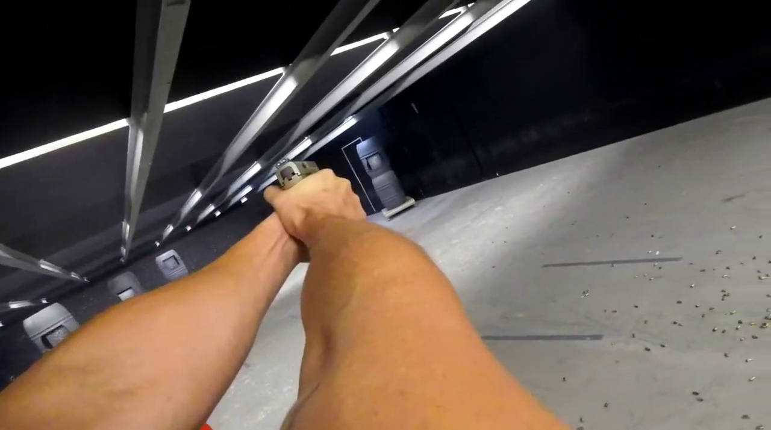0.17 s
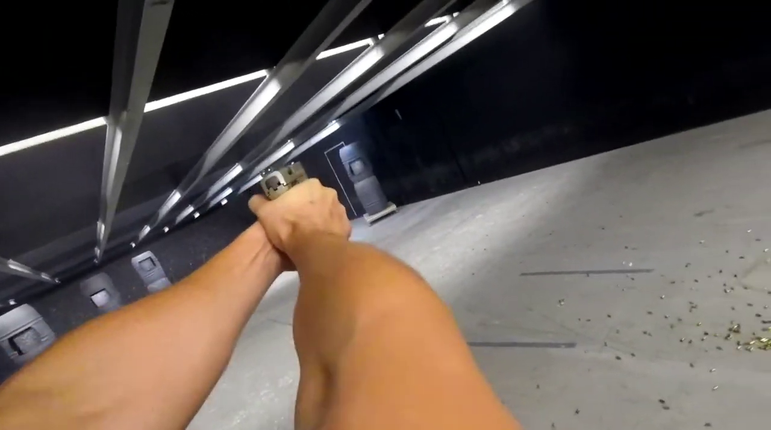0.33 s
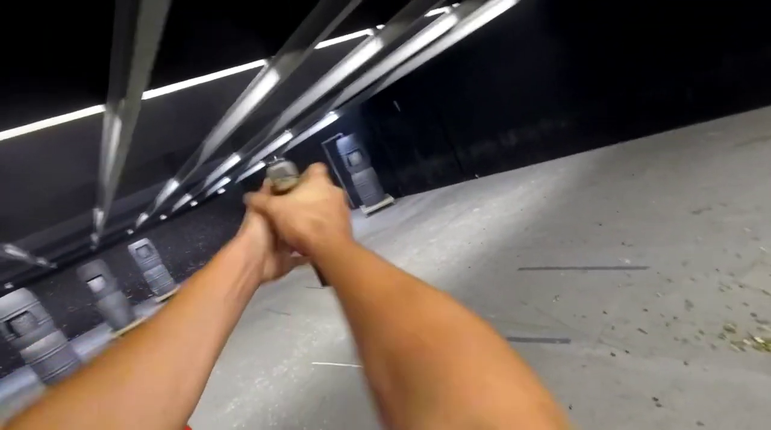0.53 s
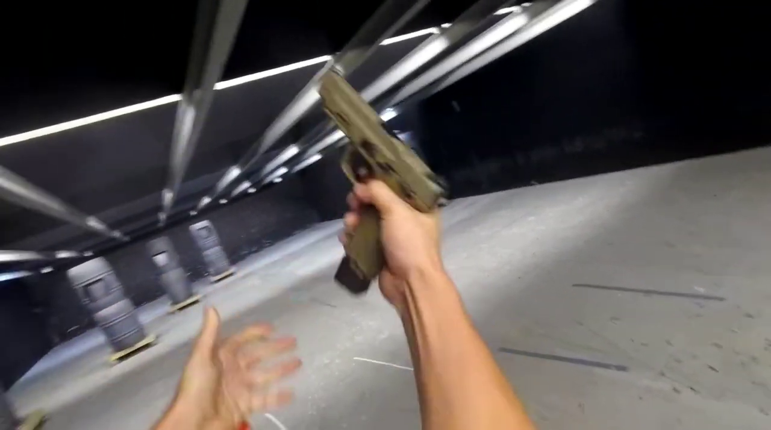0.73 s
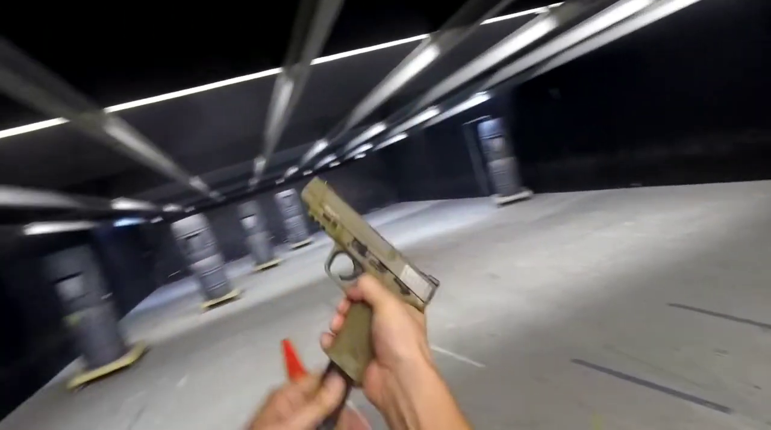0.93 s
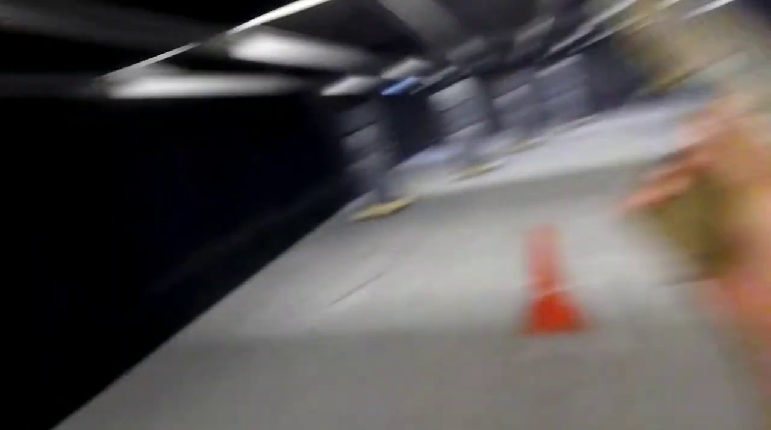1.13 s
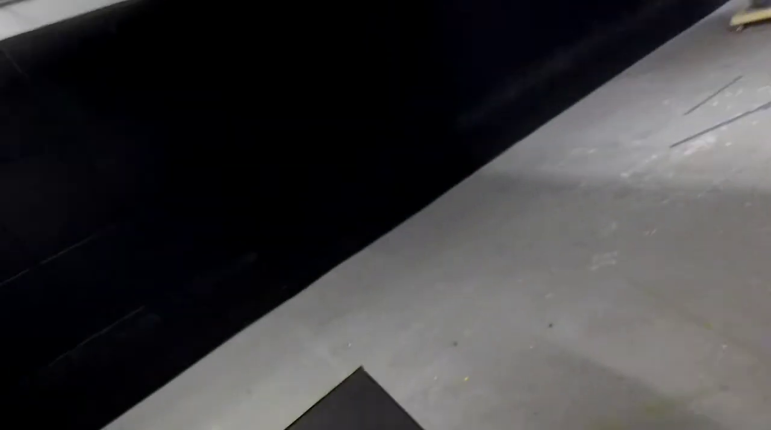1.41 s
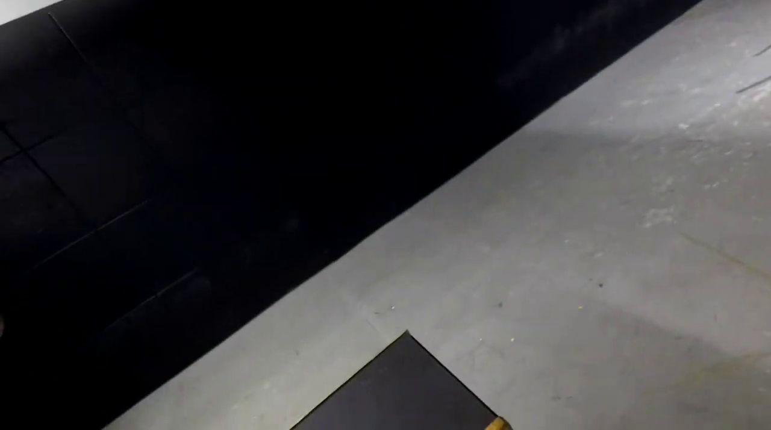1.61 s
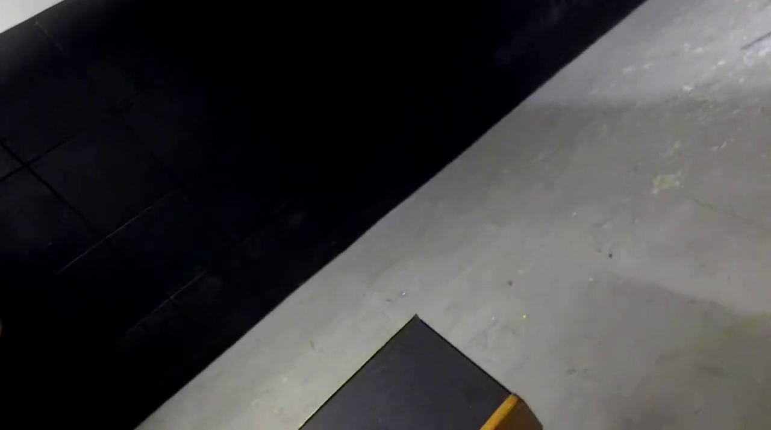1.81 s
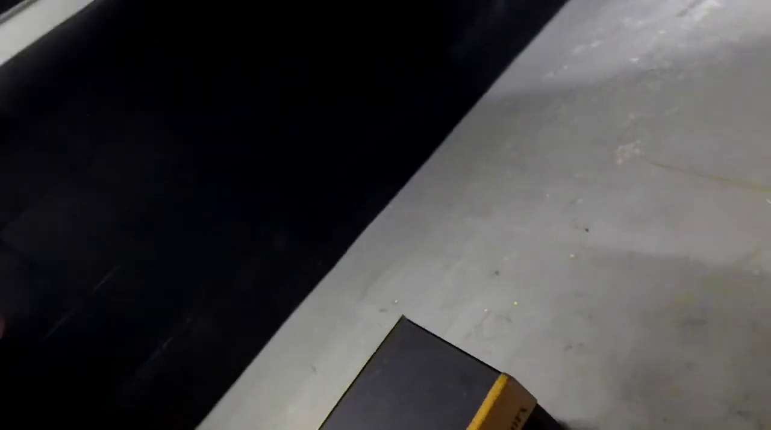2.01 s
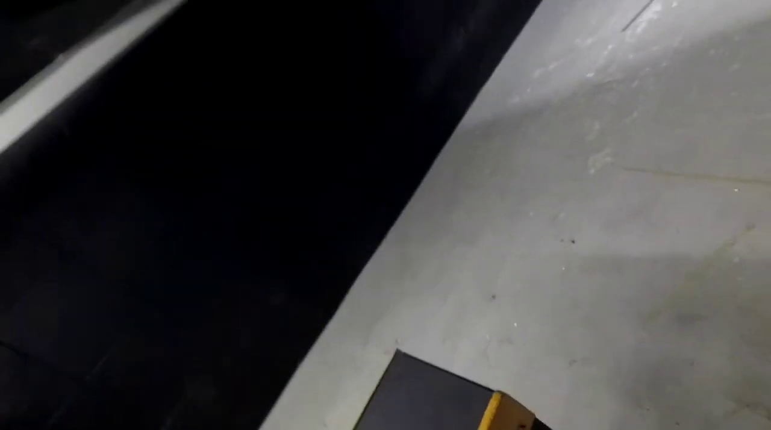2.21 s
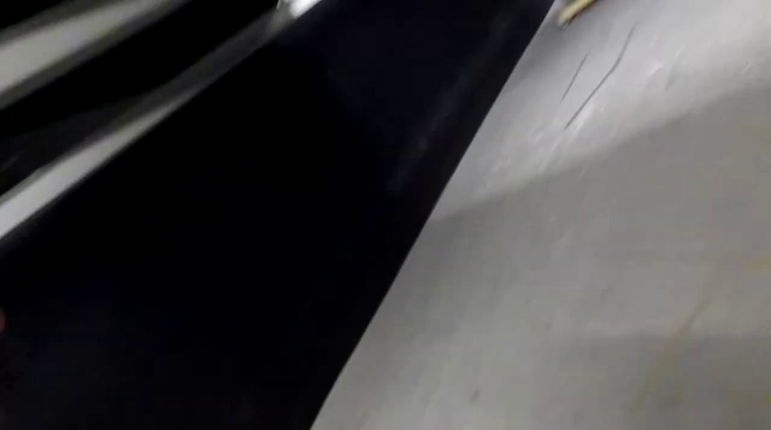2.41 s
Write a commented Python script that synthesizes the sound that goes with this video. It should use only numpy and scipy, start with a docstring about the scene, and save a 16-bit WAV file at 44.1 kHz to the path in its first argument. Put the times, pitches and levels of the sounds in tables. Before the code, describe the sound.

Heard from the shooter's head, a sharp gunshot bursts and echoes in a large indoor hall, steel pings downrange, magazine clicks and dull knocks follow, the slide snaps shut, and air rushes as the shooter moves.

```python
"""One pistol shot in an indoor range, heard at the shooter's head: a brief swell leads into the report, then
sharp cracks, pressure pulses and a gas burst overload the microphone, and filtered noise rolls through the
hall. Struck steel plates ring on as wavering partials. The reload is short noise bursts: small clicks, dull
knocks and a hard clack. Ventilation is steady noise; rumble and rush follow the motion."""
import sys
import numpy as np
from scipy import signal
from scipy.fft import rfft, irfft
from scipy.io import wavfile

SR = 44100
rng = np.random.default_rng(int(sys.argv[2]) if len(sys.argv) > 2 else 0)


def digitize_waveform(pressure):
    """Quantize a signal to 16-bit integers and store it at the path in sys.argv[1].

    Rows of a 2-D input are taken as channels; values are limited to [-1, 1].
    """
    field = np.atleast_2d(pressure).T
    bounded = np.clip(field, -1, 1)
    quanta = np.round(bounded * 32767).astype(np.int16)
    wavfile.write(sys.argv[1], SR, quanta)


N = 112454
T = np.arange(N) / SR
HZ = np.fft.rfftfreq(N, 1 / SR)

# All spectra below are relative; the noise made from them is scaled to rms 1.
# Ventilation spectrum. Each row: frequency in Hz, density in dB per Hz.
VENT_SPECTRUM = [(15, -26.5), (25, 3.5), (82, 0.5), (293, -13.5), (595, -3), (1450, -31), (1600, -5.5),
                 (1770, -27.5), (4890, -51), (5270, -33.5), (10700, -51.5), (13900, -83.5), (22000, -120)]
VENT_DB = -62
# Moving air spectrum. Each row: frequency in Hz, density in dB per Hz.
AIR_SPECTRUM = [(12, -28), (20, 1.5), (59, 2), (136, -10.5), (231, -10.5), (325, -19), (380, -16),
                (644, -28), (715, -23), (1660, -39.5), (1890, -37.5), (4630, -55), (7430, -50),
                (10700, -52), (13900, -86), (22000, -120)]
# Air levels as the shooter moves. Each row: time in seconds, rumble level in dB, rush level in dB.
MOTION_LEVELS = [(0, -57, -59.5), (.8, -67.5, -78), (1.1, -52, -70.5), (1.4, -49, -62), (1.6, -46, -56),
                 (1.9, -42, -50.5), (2.0, -43.5, -52), (2.069, -40.5, -48), (2.301, -39.5, -47.5),
                 (2.451, -38, -41.5), (2.55, -37, -42.5)]
RUMBLE_EDGE_HZ = 200

# Light metal clicks of pistol and magazine.
# Each row: start in seconds, level in dB, centre frequency in Hz, decay constant in seconds.
METAL_CLICKS = [(.126, -61.5, 4300, 0.004), (1.070, -57.5, 4600, .012), (1.180, -69.5, 4650, 0.019),
                (1.515, -63, 6000, .008)]
CLICK_WIDTH_OCTAVES = 0.33
# Magazine catch spectrum. Each row: frequency in Hz, density in dB per Hz.
CATCH_SPECTRUM = [(400, -25), (1500, -6), (2400, -11.5), (4500, -16.5), (5600, -3), (6500, -15),
                  (7600, 2.5), (8800, -21), (12000, -21)]
CATCH_S, CATCH_DB, CATCH_DECAY_S = .8235, -47.5, 0.0046
# Duller knocks of gear and feet. Each row: start in seconds, level in dB, decay constant in seconds.
GEAR_KNOCKS = [(.924, -57.5, .008), (.9925, -43, 0.0032), (1.0352, -39, 0.0025), (1.039, -43, .006),
               (2.113, -48.5, 0.02), (2.476, -46.5, 0.011)]
# Knock spectrum. Each row: frequency in Hz, density in dB per Hz.
KNOCK_SPECTRUM = [(200, -18), (480, -15), (800, 4), (1300, -1), (2200, -5.5), (2900, -20), (4500, -24),
                  (7000, -47), (11000, -48)]
# Slide release spectrum. Each row: frequency in Hz, density in dB per Hz.
SNICK_SPECTRUM = [(120, -25), (200, -8.5), (396, 9), (838, -22), (1170, 6.5), (1580, -3), (2390, -5.5),
                  (3570, -4), (4010, -20.5), (6400, 0.5), (10700, -30), (13900, -59), (22000, -120)]
SNICK_S, SNICK_DB, SNICK_DECAY_S = 1.7092, -23, .0045
# Slide closing spectrum. Each row: frequency in Hz, density in dB per Hz.
CLACK_SPECTRUM = [(60, -28), (150, -5.5), (300, -15), (600, 1), (1000, -4.5), (1500, 3), (2100, -17),
                  (3000, -12.5), (4800, -30), (6000, -20), (8000, -39), (10700, -36), (13000, -60)]
CLACK_S, CLACK_DB, CLACK_DECAY_S = 1.7335, -20, 0.0075
# The hall's answer to the clack. Each row: frequency in Hz, density in dB per Hz.
CLACK_TAIL_SPECTRUM = [(100, -16), (270, 7.5), (420, -7), (600, 2.5), (800, 3.5), (1100, -8), (1500, -5),
                       (2500, -14), (4600, -28.5), (6500, -33), (8500, -33.5), (10500, -53), (13000, -65)]
CLACK_TAIL_DB, CLACK_TAIL_RISE_S = -29, 0.0049
SMALL_ROOM_DB, HANDLING_T60_SHARE = -12, .6

# Modes of the plate struck by this shot.
# Each row: frequency in Hz, peak level in dB, time of the peak in seconds, t60 in seconds.
PLATE_MODES = [(3009, -45, .40, 0.53), (3338, -51, .47, 0.86), (4260, -54, .38, 0.33),
               (5200, -56.5, .42, 0.42), (5320, -66, .62, 1.55), (7240, -60, .42, 1.26),
               (7310, -50, .42, 0.89), (8720, -86.5, 1, 3.3), (9800, -69.5, 0.32, 0.84),
               (10780, -63.5, .36, 0.48)]
PLATE_S, LONG_RING_RISE_S = 0.22, 0.073
# Plate still ringing from the hit before.
# Each row: frequency in Hz, level at time zero in dB, t60 in seconds.
OLD_PLATE_MODES = [(1577, -56, 1.8), (1642, -57, 1.8), (5179, -78, 1.2), (7138, -82, 1.3)]
OLD_PLATE_END_S, OLD_PLATE_FADE_S = .3, .1
# Longest ring, swelling and fading. Each row: time in seconds, level in dB.
LOW_RING_LEVELS = [(.25, -48), (.6, -61.5), (.68, -71), (.75, -62), (.88, -60), (1.0, -61.5), (1.07, -68),
                   (1.15, -65), (1.26, -57.5), (1.34, -62), (1.43, -73), (1.52, -65), (1.7, -78.5),
                   (2.5, -87)]
LOW_RING_HZ, HIGH_RING_HZ, HIGH_RING_DB = 1618.6, 7195, -83

SHOT_S, CRACK_S = .2152, .2164
# Swell just before the report's peak. Each row: frequency in Hz, density in dB per Hz.
SWELL_SPECTRUM = [(60, -22.5), (150, -8), (300, -1), (600, -12), (1000, -22.5), (1900, -8.5), (2500, -14),
                  (2800, -27), (3400, -15.5), (4200, -23.5), (4800, -36), (7200, -34.5), (8400, -26.5),
                  (10000, -38.5), (11000, -51.5)]
# Resonances in the swell. Each row: frequency in Hz, level in dB.
SWELL_RESONANCES = [(334, -12), (1170, -25.5), (1355, -20.5), (1820, -13), (1915, -22), (2300, -22.5),
                    (2400, -23), (3240, -27.5), (3800, -31.5)]
SWELL_S, SWELL_DB, SWELL_POWER = 0.044, -13, 2.5
# Muzzle blast and its slap off floor, walls and ceiling.
# Each row: start in seconds, level in dB (near the peak), pulse length in seconds.
BLAST_PULSES = [(.2155, -6, 0.00024), (0.2214, -3, .0018), (0.2233, -1.5, 0.00068), (0.2506, -5, 0.00082),
                (.2950, -12.5, .0004)]
# Near part of the report. Each row: frequency in Hz, density in dB per Hz.
BODY_SPECTRUM = [(18, -37.5), (30, -1), (220, 2.5), (496, -7), (791, -5.5), (1920, -28.5), (3210, -25),
                 (3730, -29), (5260, -35.5), (5800, -23.5), (10700, -37), (13900, -70), (22000, -120)]
BODY_DB, BODY_HOLD_S, BODY_FALL_S = -10, .010, 0.0029
# The hall's answer to the shot. Each row: frequency in Hz, density in dB per Hz.
HALL_SPECTRUM = [(24, -45.5), (40, -10.5), (152, -2.5), (183, -4.5), (292, 0), (387, -14), (445, -2.5),
                 (799, -4), (898, -5.5), (1030, -12.5), (1650, -13), (2700, -24.5), (2960, -28.5),
                 (7040, -30.5), (10700, -44), (13900, -81.5), (22000, -120)]
HALL_DB, HALL_HOLD_S, HALL_RISE_S = -16.5, 0.036, .008
# Hall decay, shortened for handling by its share. Each row: frequency in Hz, t60 in seconds.
HALL_DECAY = [(60, .5), (200, .52), (600, 0.59), (1500, 0.61), (3500, .6), (7000, 0.49), (11000, .42)]

# Stereo width. Each row: frequency in Hz, side gain relative to mid in dB.
SIDE_GAIN = [(100, -45.5), (1000, -38.5), (4000, -30.5), (8000, -25), (10500, -20), (12000, -25)]
CEILING, CUTOFF_HZ = .92, 11100


def amp(db):
    """Decibels to gain."""
    return 10 ** (np.asarray(db) / 20)


def unit(x):
    """Scales to rms 1."""
    return x / np.sqrt(np.mean(x ** 2) + 1e-20)


def read(points, hz):
    """Reads a table on a log-frequency axis."""
    f, value = np.transpose(points)
    return np.interp(np.log(hz + 1), np.log(f + 1), value)


def noise(gain):
    """Random-phase noise of rms 1 with the given gain per frequency."""
    phase = np.exp(2j * np.pi * rng.random(len(HZ)))
    return unit(irfft(gain * phase, N))


def coloured(points):
    """Noise of rms 1 with a tabled spectrum."""
    return noise(amp(read(points, HZ)))


def lumps(db, rate_hz):
    """A random gain that wanders by db rms at rates up to about rate_hz."""
    return amp(db * noise(1 / (1 + (HZ / rate_hz) ** 4)))


def tone(hz, waver=.2, waver_hz=7):
    """One partial of rms 1, wavering as it reaches the moving microphone by many paths."""
    slow = 1 / (1 + (HZ / waver_hz) ** 4)
    path = 1 + waver * (noise(slow) + 1j * noise(slow))
    carrier = np.exp(2j * np.pi * (hz * T + rng.random()))
    return unit((path * carrier).real)


def strike(start_s, decay_s, rise_s=.0003):
    """Envelope with a quick linear rise and an exponential fall."""
    age_s = np.maximum(T - start_s, 0)
    return np.minimum(age_s / rise_s, 1) * np.exp(-age_s / decay_s)


def die_away(x, start_s, t60_share=1):
    """Lets each band of x decay from start_s at the hall's t60 times the share."""
    hz, t, z = signal.stft(x, SR, nperseg=512, noverlap=384)
    t60_s = t60_share * read(HALL_DECAY, hz)[:, None]
    z = z * amp(-60 * np.maximum(t - start_s, 0) / t60_s)
    return signal.istft(z, SR, nperseg=512, noverlap=384)[1][:N]


def room(x):
    """The hall's diffuse answer to a small sound: convolution with decaying noise."""
    tail = die_away(rng.standard_normal(N), 0, HANDLING_T60_SHARE)
    tail = tail * np.minimum(T / 0.0096, 1)
    return signal.fftconvolve(x, tail / np.linalg.norm(tail))[:N]


def air():
    """Steady ventilation, with low rumble and higher rush that follow the shooter's motion."""
    s, rumble_db, rush_db = np.transpose(MOTION_LEVELS)
    colour = amp(read(AIR_SPECTRUM, HZ))
    low = 1 / (1 + (HZ / RUMBLE_EDGE_HZ) ** 4)  # power share of the rumble
    rumble = amp(np.interp(T, s, rumble_db)) * noise(colour * np.sqrt(low) * (HZ > 12))
    rush = amp(np.interp(T, s, rush_db)) * noise(colour * np.sqrt(1 - low))
    moving = rumble * lumps(db=2, rate_hz=12) + rush * lumps(db=1.22, rate_hz=12)
    return moving + amp(VENT_DB) * coloured(VENT_SPECTRUM)


def handling():
    """Light impacts: slide release, magazine catch, clicks and knocks as decaying noise bursts."""
    out = amp(SNICK_DB) * strike(SNICK_S, SNICK_DECAY_S, rise_s=0.000732) * coloured(SNICK_SPECTRUM)
    out = out + amp(CATCH_DB) * strike(CATCH_S, CATCH_DECAY_S) * coloured(CATCH_SPECTRUM)
    for start_s, db, hz, decay_s in METAL_CLICKS:
        octaves = np.log2((HZ + 1) / hz)
        band = 1 / (1 + (octaves / CLICK_WIDTH_OCTAVES) ** 2)
        out = out + amp(db) * strike(start_s, decay_s) * noise(band)
    for start_s, db, decay_s in GEAR_KNOCKS:
        out = out + amp(db) * strike(start_s, decay_s) * coloured(KNOCK_SPECTRUM)
    return out


def slide_clack():
    """The slide clacks shut, a hard noise burst, and the hall answers with decaying noise."""
    clack = strike(CLACK_S, CLACK_DECAY_S, rise_s=0.0008) * coloured(CLACK_SPECTRUM)
    tail = die_away(coloured(CLACK_TAIL_SPECTRUM), CLACK_S, HANDLING_T60_SHARE)
    tail = tail * np.clip((T - CLACK_S) / CLACK_TAIL_RISE_S, 0, 1)
    return amp(CLACK_DB) * clack + amp(CLACK_TAIL_DB) * tail


def reload():
    """Light impacts with their room sound, and the slide closing."""
    small = handling()
    clack = slide_clack()
    return small + amp(SMALL_ROOM_DB) * room(small) + clack


def plates():
    """Steel plates ring downrange; each new mode grows to its peak and dies away."""
    new = np.zeros(N)
    for hz, db, peak_s, t60_s in PLATE_MODES:
        growth = np.clip((T - PLATE_S) / (peak_s - PLATE_S), 0, 1)
        fall = amp(db - 60 * np.maximum(T - peak_s, 0) / t60_s)
        new = new + growth * fall * tone(hz, waver=0.12)
    low_ring = amp(np.interp(T, *np.transpose(LOW_RING_LEVELS))) * tone(LOW_RING_HZ, waver=0.056)
    high_ring = amp(HIGH_RING_DB) * tone(HIGH_RING_HZ, waver=0.28)
    long_rise = np.clip((T - PLATE_S) / LONG_RING_RISE_S, 0, 1)
    old = sum(amp(db - 60 * T / t60_s) * tone(hz, waver=0.092) for hz, db, t60_s in OLD_PLATE_MODES)
    old_fade = np.clip((OLD_PLATE_END_S - T) / OLD_PLATE_FADE_S, 0, 1)
    return new + long_rise * (low_ring + high_ring) + old * old_fade


def hall_roll():
    """The hall's answer to the shot: noise whose bands decay at their own t60."""
    tail = die_away(coloured(HALL_SPECTRUM), SHOT_S + HALL_HOLD_S)
    rise = np.clip((T - SHOT_S) / HALL_RISE_S, 0, 1)
    return amp(HALL_DB) * tail * rise


def gas_burst():
    """Turbulent gas: noise held briefly, then falling exponentially."""
    fall = np.exp(-np.maximum(T - CRACK_S - BODY_HOLD_S, 0) / BODY_FALL_S)
    return amp(BODY_DB) * (T > CRACK_S) * fall * coloured(BODY_SPECTRUM)


def blasts():
    """Pressure pulses: a fast rise, a fall through zero and a decaying suction phase."""
    out = np.zeros(N)
    for start_s, db, length_s in BLAST_PULSES:
        u = np.maximum(T - start_s, 0) / length_s
        pulse = np.minimum(u / .25, 1) * (1 - u) * np.exp(-u)
        out = out + amp(db) * pulse * 1.6  # brings the peak near 1
    return out


def crack(start_s, hz, db, length_s):
    """A few cycles of sharp ringing at the front of the shot, under a Gaussian fall."""
    age_s = np.maximum(T - start_s, 0)
    return amp(db) * np.sin(2 * np.pi * hz * age_s) * np.exp(-(age_s / length_s) ** 2)


def swell():
    """A short ringing swell of noise and resonances that runs into the peak of the report."""
    ring = sum(amp(db) * tone(hz, waver=0.19) for hz, db in SWELL_RESONANCES)
    rise = np.clip(1 + (T - SHOT_S) / SWELL_S, 0, 1) ** SWELL_POWER
    stop = np.exp(-np.maximum(T - SHOT_S, 0) / .002)
    return rise * stop * (amp(SWELL_DB) * coloured(SWELL_SPECTRUM) + ring)


def shot():
    """Swell, cracks, pressure pulses, a burst of turbulent gas and the lumpy roll of the hall."""
    front = swell() + blasts()
    front = front + crack(SHOT_S, hz=1850, db=-2, length_s=.0014)
    front = front + crack(CRACK_S, hz=6050, db=-3.5, length_s=.0011)
    roll = hall_roll()
    return front + gas_burst() + roll * lumps(db=1.5, rate_hz=110)


def scene():
    """All sources, nearly mono, with a little width in the treble."""
    mid = shot() + plates() + reload() + air()
    side = irfft(1j * rfft(mid) * amp(read(SIDE_GAIN, HZ)), N)  # 90 degrees from mid
    return np.array([mid + side, mid - side])


def record(dry):
    """The microphone's soft overload, then the band limit."""
    clipped = dry / (1 + (dry / CEILING) ** 4) ** (1 / 4)
    lowpass = signal.firwin(101, CUTOFF_HZ, window=("kaiser", 7), fs=SR)
    return signal.oaconvolve(clipped, lowpass[None], "same")


dry = scene()
out = record(dry)
digitize_waveform(out)
```